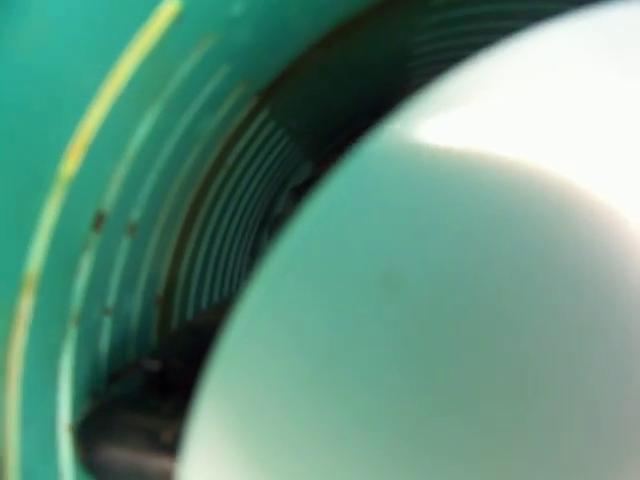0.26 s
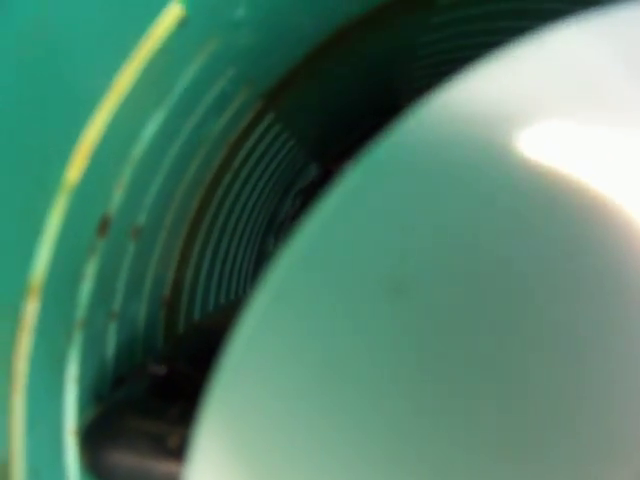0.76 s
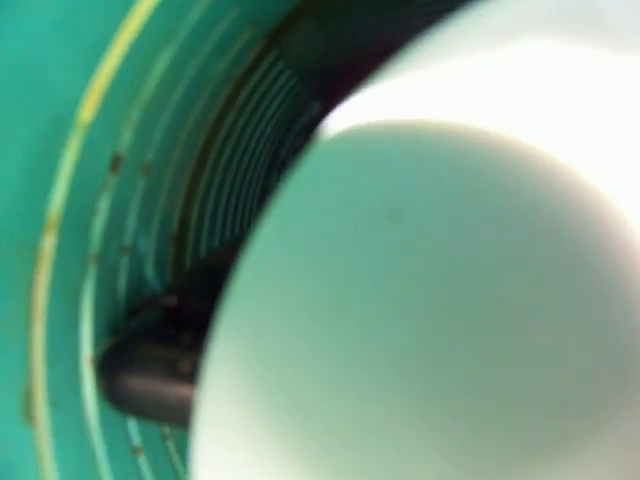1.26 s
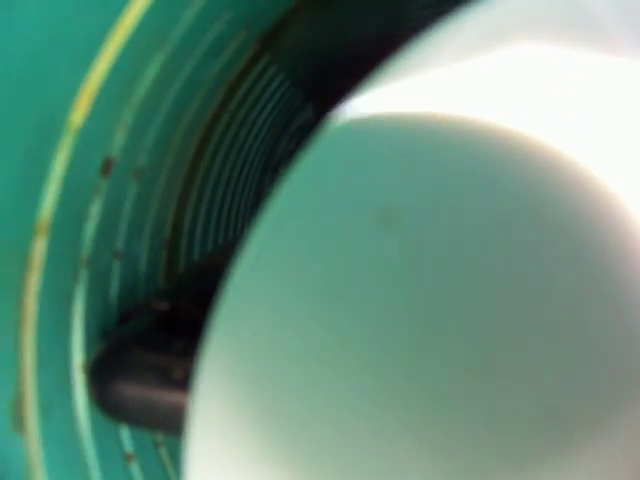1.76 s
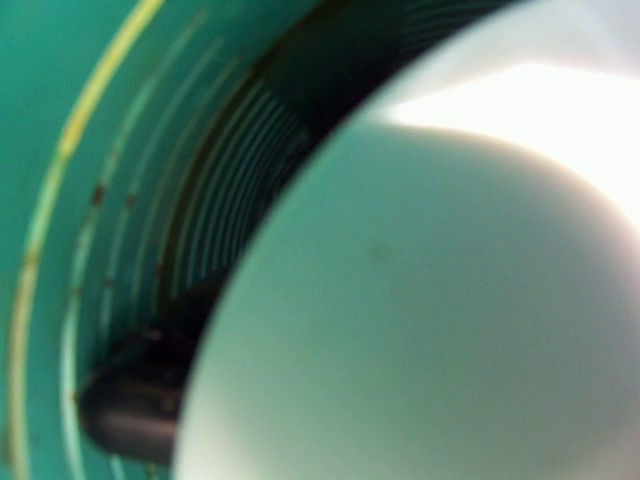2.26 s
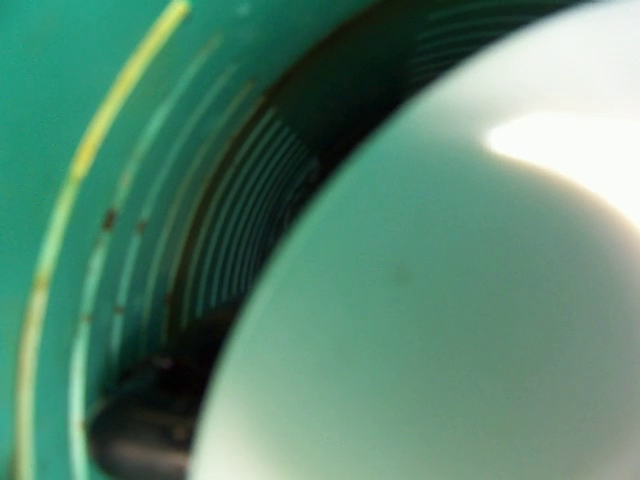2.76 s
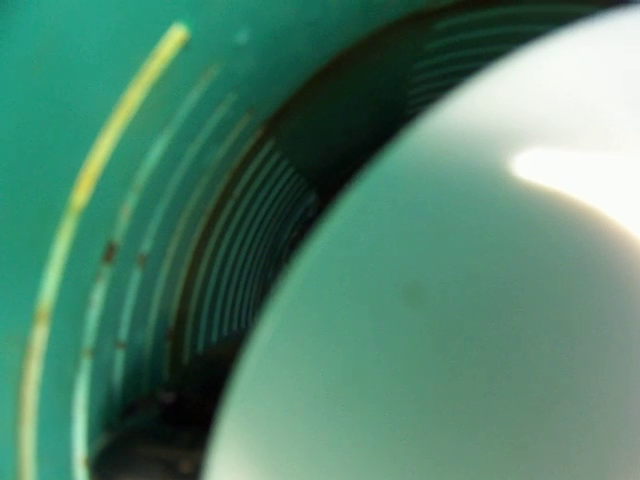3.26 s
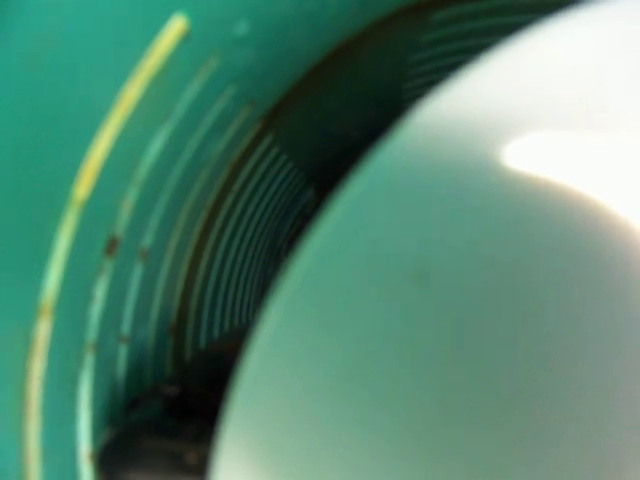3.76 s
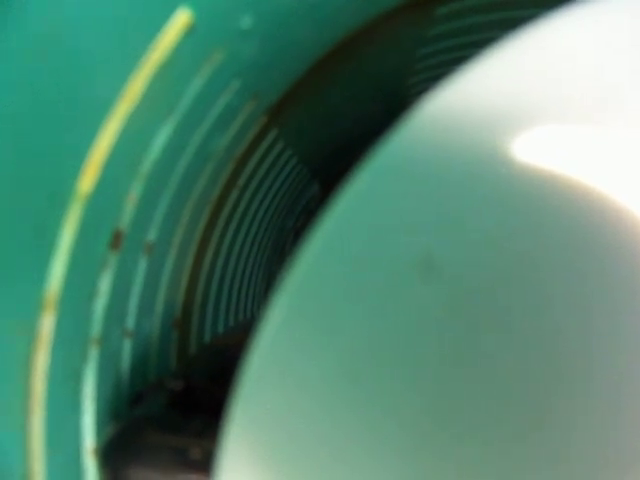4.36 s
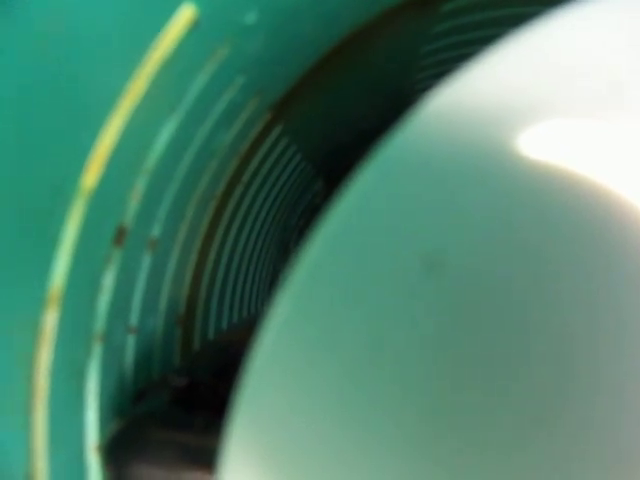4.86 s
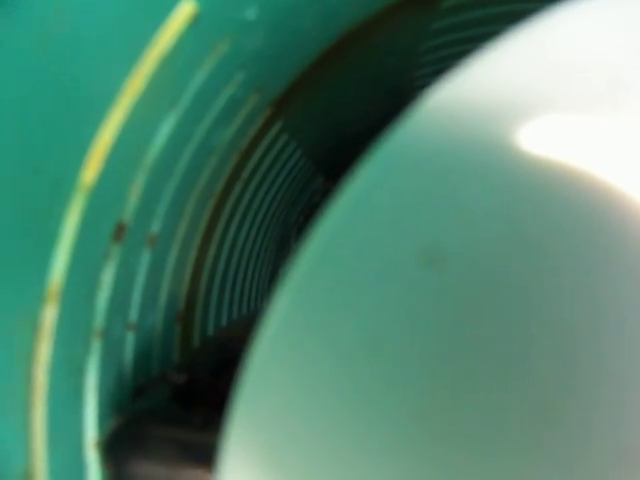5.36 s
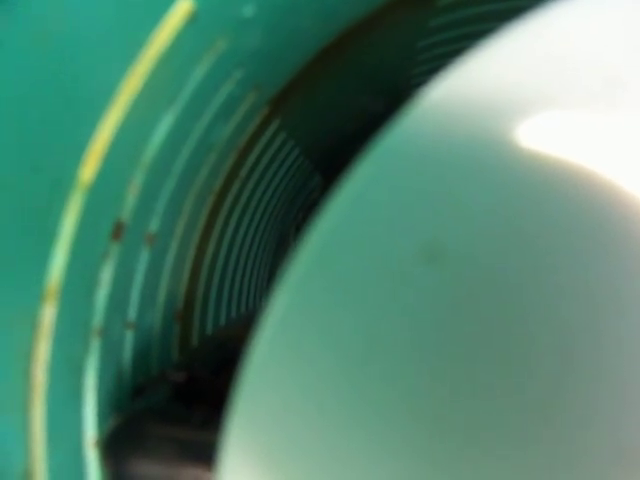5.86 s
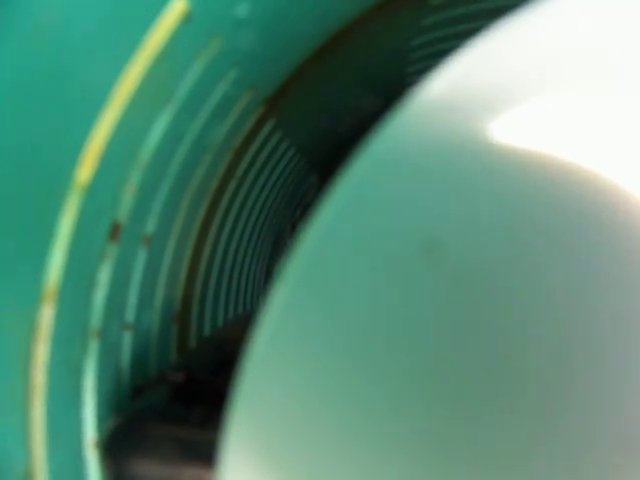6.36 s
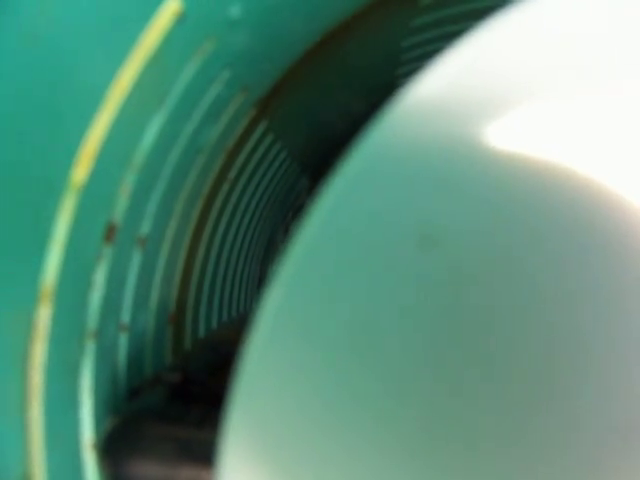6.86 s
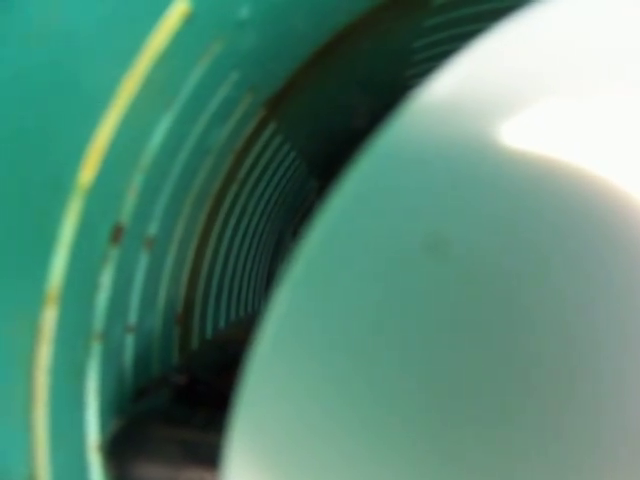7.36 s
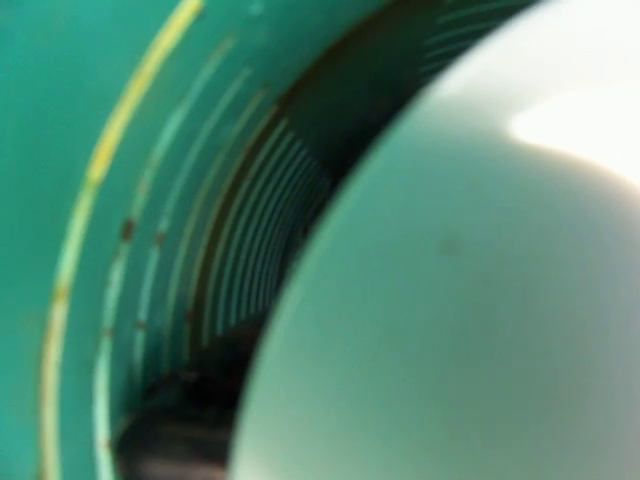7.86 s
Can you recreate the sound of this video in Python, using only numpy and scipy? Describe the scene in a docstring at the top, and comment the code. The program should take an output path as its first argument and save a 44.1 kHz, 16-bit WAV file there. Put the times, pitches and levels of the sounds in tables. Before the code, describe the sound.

A low, wavering pump hum with soft rumble, thin air noise and a very faint high whine continues throughout, heard close above a plastic standpipe. From 0 to 0.25 s a fuzzy, broken squeak slides upward in a puff of hiss, capped by a sharp plastic tick near 0.34 s. Then mostly hum, with faint wet ticks around 1.6 to 1.9 s. At about 2.3 s water starts gulping air: dense, ragged slaps, low glugs and hollow ringing bubbles, strongest around 2.8 to 3.3 s. Gulps thin briefly near 3.4 to 4 s, then return in uneven clusters from 4 to 5.1 s. From 5.2 to 6.1 s only a thin dribble remains, with scattered plinks. Around 6.2 s the flow strengthens, bubbling and splashing with gulps until about 7.1 s, then running on as a fuller, bright trickle to the end at 8 s. Reflections are short and tubular.

```python
"""Bell siphon starting to draw

Heard from close above a plastic standpipe, over a steady pump hum, with a brief rising squeak at the start.
Water gulps air in ragged bursts, eases to a thin dribble, then runs on more strongly with further gulps.
Gulps are clusters of noise splats and ringing, decaying sines for air bubbles, coloured by pipe resonances;
the trickle is swarms of small bubbles and droplets, and the pump is wavering tones in filtered noise."""
import sys
import numpy as np
from scipy import signal
from scipy.fft import rfft, irfft
from scipy.io import wavfile

SR = 44100
rng = np.random.default_rng(int(sys.argv[2]) if len(sys.argv) > 2 else 0)


def persist_wave(psi):
    """Save psi, clipped to +-1, as 16-bit WAV."""
    counts = np.round(np.clip(psi, -1, 1) * 32767).astype(np.int16)
    wavfile.write(sys.argv[1], SR, np.atleast_2d(counts).T)


N = 358091
TIME = np.arange(N) / SR

# The running water. Each row: time in seconds, level in dB, deep gurgle relative to it in dB.
FLOW = [(2.2, -58, -7), (2.5, -53.5, 12.5), (2.7, -43, 9.5), (2.9, -39, -4.5), (3.3, -47, 2),
        (3.65, -48, 2.5), (3.98, -51, 1), (4.45, -46.5, -2.5), (4.82, -48.5, -2), (5.0, -38, 4.5),
        (5.15, -46.5, 2.5), (5.55, -48, -4.5), (5.87, -52, -14.5), (6.3, -36.5, -6.5), (6.72, -35.5, 6),
        (7.28, -37.5, -11), (7.73, -38.5, -5), (8.1, -32.5, 1)]
# Colours of the three parts of a splash. Each row: frequency in Hz, relative level in dB per Hz.
THUD = [(60, -12), (150, -11), (300, -0.5), (520, 0.5), (720, -6.5), (1100, -13.5), (2500, -39.5)]
SLAP = [(300, -27), (650, -7), (900, 1), (1150, -8), (1700, -0.5), (2600, -1.5), (3400, -12.5),
        (4200, -22.5), (6000, -66)]
SPRAY = [(2000, -28), (3500, -3), (4200, -12.5), (5100, -2), (6100, -5.5), (7300, -1.5), (8200, -8),
         (9000, -4.5)]


def gain_of(db):
    """Decibels to amplitude."""
    return 10 ** (np.asarray(db) / 20)


def evened(x):
    """Scales to an rms of one."""
    return x / np.sqrt(np.mean(x ** 2) + 1e-20)


def curve(rows):
    """Joins the rows by straight lines, one signal per column after the time."""
    s, *columns = np.transpose(rows)
    return [np.interp(TIME, s, c) for c in columns]


def add(mix, s, sound):
    """Mixes a sound in at time s, in place."""
    part = mix[max(0, round(s * SR)):][:len(sound)]
    part += sound[:len(part)]


def wander(hz):
    """Slow chance of unit rms: noise kept to about hz changes a second."""
    hz_axis = np.fft.rfftfreq(N, 1 / SR)
    spectrum = rfft(rng.standard_normal(N)) * np.exp(-(hz_axis / hz) ** 2)
    return evened(irfft(spectrum, N))


def in_pipe(x, spectrum, share, size=4096):
    """Causal filter of unit energy: a broad spectrum lifted at the pipe resonances, by the given share."""
    # Each row: resonance in Hz, width in Hz, full lift in dB.
    resonances = [(900, 240, 13), (1337.5, 82, 14.5), (1705, 82, 9.5), (2300, 520, 4.5), (3155, 240, 4),
                  (5205, 300, 4.5), (8000, 260, 11)]
    hz = abs(np.fft.fftfreq(size, 1 / SR))
    f, db = np.transpose(spectrum)
    db = np.interp(np.log(hz + 1), np.log(f), db)
    lifts = sum(lift / (1 + (2 * (hz - centre) / width) ** 2) for centre, width, lift in resonances)
    log_gain = np.log(gain_of(db + share * lifts))
    # minimum phase: the energy comes as early as this colour allows
    response = np.exp(np.conj(signal.hilbert(log_gain)))
    taps = np.fft.ifft(response).real[:size // 2]
    return signal.oaconvolve(x, taps / np.linalg.norm(taps))[:N]


def bubble(hz, ring, rise, onset):
    """An air pocket swells into ringing and dies; positive rise lifts its pitch, as on nearing the surface."""
    # age counts ring times; a ring under 0.5 ms is stretched to that, its pitch lowered in proportion
    age = np.arange(0, 8, 1 / (max(ring, 1 / 2000) * SR))
    swing = (1 - np.exp(-age / onset)) ** 2 * np.exp(-age)
    cycles = hz * ring * (age + rise * age ** 2)
    return swing / swing.max() * np.sin(2 * np.pi * cycles)


def spatter(decay, swell):
    """A few milliseconds of bursting foam: enveloped spiky noise of unit energy, different every time."""
    t = np.arange(1, SR // 30) / SR
    grain = rng.standard_normal(len(t))
    spiky = grain * abs(grain)
    burst = spiky * (1 - np.exp(-t / swell)) * np.exp(-t / decay)
    return burst / np.linalg.norm(burst)


def gulp_splats(count=12):
    """Longer gulps open and close with a splat, uneven ones between: rows (s, thud dB, slap dB, spray dB)."""
    # Each row: start in seconds, length in seconds (under half a gap: one splat), thud, slap and spray in dB.
    gulps = [(.286, 0.0023, -50, -56, -47), (1.578, 0, -53, -45, -54), (1.72, 0.0064, -44, -37.5, -71),
             (1.942, 0, -68, -60, -47), (2.314, 0.00031, -32.5, -38.5, -50.5),
             (2.405, 0.0064, -39, -32, -39.5), (2.456, 0, -29, -31, -38), (2.487, 0.068, -32.5, -32, -42.5),
             (2.629, 0.007, -26.5, -30, -46.5), (2.675, 0.083, -28, -29.5, -42.5),
             (2.821, 0.0087, -22.5, -25.5, -42), (2.848, 0.011, -23, -19.5, -34.5),
             (2.92, 0.00049, -20, -32.5, -55), (2.952, 0.0075, -25, -29.5, -35.5),
             (3.055, 0.013, -26, -25, -36.5), (3.119, 0.031, -16.5, -23, -36),
             (3.151, 0.019, -39, -24, -33), (3.209, 0, -38, -28.5, -28.5), (3.289, 0.016, -25, -24, -33.5),
             (3.328, 0, -27, -27, -28), (3.367, 0.01, -40, -33, -59), (3.502, 0, -31, -37, -64),
             (3.528, 0.0048, -37, -30, -31), (3.559, 0.0065, -23.5, -26, -31),
             (3.585, 0.023, -31.5, -33.5, -53), (3.674, 0.0029, -25.5, -40, -47),
             (3.716, 0, -26, -29.5, -45), (3.742, 0, -37, -26, -59), (3.821, 0, -37, -40, -45.5),
             (3.877, 0.008, -24.5, -31, -31.5), (4.024, 0.047, -21.5, -22, -36),
             (4.116, .029, -25, -34, -34.5), (4.178, 0.0037, -26.5, -30.5, -44),
             (4.281, 0.0068, -22, -28.5, -37), (4.343, 0, -41, -42, -55), (4.38, 0.0075, -22.5, -23.5, -31),
             (4.413, 0.012, -30.5, -32, -54), (4.453, 0.0048, -20, -26, -36.5),
             (4.485, .015, -28, -24.5, -49.5), (4.517, 0, -54, -36, -29.5), (4.538, 0, -31, -27, -42),
             (4.574, 0.0033, -19.5, -26.5, -38), (4.643, 0.0015, -47, -31.5, -34),
             (4.666, 0.049, -25, -23.5, -34), (4.745, 0.0014, -22.5, -32, -28),
             (4.763, .014, -19.5, -31, -40), (4.919, 0.076, -28, -26, -39), (5.019, 0, -25, -27, -56),
             (5.07, .011, -29, -35.5, -55), (5.251, 0.004, -38, -44, -62), (5.458, 0.0059, -48, -34, -65),
             (5.542, 0.0089, -42.5, -38.5, -45), (6.103, 0.0019, -50, -58, -35.5),
             (6.181, 0, -46, -37, -34.5), (6.227, 0.0032, -41, -30, -36), (6.263, 0.0026, -50, -28.5, -39),
             (6.324, .019, -33, -27.5, -31.5), (6.36, 0, -42, -29.5, -37), (6.394, 0, -28, -25.5, -48),
             (6.53, 0, -29, -40, -37), (6.552, 0.005, -27, -34, -37), (6.58, 0.033, -25.5, -27, -37),
             (6.638, .016, -39, -25, -56), (6.686, 0.086, -25.5, -26, -37),
             (6.822, 0.0087, -24, -37, -36.5), (6.864, 0.0066, -25, -25.5, -34.5),
             (6.911, 0.033, -32, -29.5, -40.5), (6.995, 0.019, -24, -34, -44),
             (7.069, 0.0041, -30, -30, -49), (7.313, 0, -50, -34, -41), (7.36, 0.004, -55, -32, -49),
             (7.578, 0.0079, -34.5, -30.5, -37.5), (7.663, 0.0017, -33, -34, -43),
             (7.804, 0.0039, -34, -37, -43), (7.892, .023, -35, -39, -39.5), (7.958, .13, -40, -35.5, -60)]
    gap_s, jitter, spread_db = .013, .3, 3.5  # jitter is a share of the actual gap
    rows = []
    for (start, length, *levels), draws in zip(gulps, rng.uniform(-1, 1, (len(gulps), count, 4))):
        gaps = min(round(length / gap_s), count - 1)
        for k, (late, *louder) in enumerate(draws[:gaps + 1]):
            inside = 0 < k < gaps
            s = start + length * (k + inside * jitter * late) / max(gaps, 1)
            splat_levels = np.array(levels) + inside * spread_db * np.array(louder)
            rows.append([s, *splat_levels])
    return np.array(rows)


def stray_splats(count=170):
    """The running water splats at odd moments, as strongly as it flows; same rows as for the gulps."""
    part_db, spread_db = (-3, -1, -8), 6  # thud, slap and spray relative to the flow
    s, flow_db, deep_db = np.transpose(FLOW)
    when = s[0] + (s[-1] - s[0]) * (np.arange(count) + rng.random(count)) / count
    chance_db = spread_db * rng.uniform(-1.2, 1, (count, 3))
    levels = np.interp(when, s, flow_db)[:, None] + part_db + chance_db
    levels[:, 0] += np.interp(when, s, deep_db)
    return np.column_stack([when, levels])


def splat_part(times, levels, spectrum, part_db, decay, swell, share, count=61):
    """One noise burst in the pipe for each splat; its level plus part_db is the rms over 5 ms."""
    out = np.zeros(N)
    pipe = in_pipe(np.ones(1), spectrum, share)
    bursts = [signal.fftconvolve(spatter(decay, swell), pipe) for _ in range(count)]
    for k, (s, db) in enumerate(zip(times, levels)):
        burst = bursts[k % count]
        unit_rms = np.sqrt(SR / 200) * burst / np.linalg.norm(burst)
        add(out, s, gain_of(db + part_db) * unit_rms)
    return out


def spray_bubbles(hits, ring_db=-1, ring=0.0013, lag=0.0045, count=2):
    """Each splat traps a couple of tiny bubbles that ping within lag seconds of it."""
    out = np.zeros(N)
    for (s, _, _, spray_db), draws in zip(hits, rng.random((len(hits), count, 2))):
        for when, size in draws:
            ping = bubble(4900 + 3300 * size, ring, rise=0.0013, onset=0.68)
            add(out, s + lag * when, gain_of(spray_db + ring_db) * ping)
    return out


def splats(hits):
    """Water closing over the air gap: a low thud, a slap in the pipe and fine spray."""
    s, thud_db, slap_db, spray_db = hits.T
    thud = splat_part(s, thud_db, THUD, part_db=-0.7, decay=0.0016, swell=0.0002, share=0.27)
    slap = splat_part(s, slap_db, SLAP, part_db=-1.5, decay=0.0016, swell=0.00028, share=0.82)
    spray = splat_part(s, spray_db, SPRAY, part_db=2, decay=0.0012, swell=0.00032, share=1.0)
    return thud + slap + spray + spray_bubbles(hits)


def loud_bubbles(bubble_db=-0.16):
    """The loudest single bubbles and short watery clicks, each a brief ringing with a climbing pitch."""
    # Each row: time in seconds, level in dB before bubble_db, starting pitch in Hz, ring time in seconds.
    loudest = [(2.6924, -25, 454, 0.0084), (2.7504, -17.5, 1390, .0047), (2.819, -15, 820.7, .0061),
               (2.8577, -19, 2740, .0017), (2.8623, -20, 2260, 0.00095), (2.8657, -15.5, 920, 0.0042),
               (2.9742, -17, 1699, .0043), (2.9761, -6, 912, 0.0018), (3.0579, -8.5, 864, 0.0038),
               (3.07, -9.5, 827, 0.0025), (3.116, -20, 487, .0073), (3.118, -13, 860, 0.0045),
               (3.139, -22, 375, .005), (3.1481, -10, 864, 0.0025), (3.2064, -17, 880, .0027),
               (3.2863, -21, 890, 0.01), (3.2884, -14, 2390, 0.0015), (3.32, -18, 887.7, 0.0062),
               (4.0364, -18, 796.4, 0.0057), (4.1281, -15.5, 798, 0.0071), (4.1429, -19, 595.2, 0.0054),
               (4.1445, -16, 2300, 0.0024), (4.2473, -20.5, 820.4, 0.0048), (4.3756, -15.5, 865, 0.0054),
               (4.3884, -12.5, 2871, 0.00072), (4.3922, -23, 2436, .0016), (4.4113, -17, 877.8, 0.0031),
               (4.4229, -25, 408, 0.0066), (4.452, -12, 426.8, 0.0049), (4.4696, -25, 2380, 0.0035),
               (4.4977, -20.5, 2490, 0.0051), (4.4979, -14, 1300, 0.0065), (4.5359, -18, 840, .0034),
               (4.5457, -21, 860.6, 0.0044), (4.5734, -13, 818, 0.0023), (4.6767, -12, 2281, 0.00058),
               (4.6816, -24, 2264, 0.004), (4.697, -16.5, 1211, 0.0033), (4.709, -25, 2438, 0.0087),
               (4.734, -13.5, 1294, 0.0032), (4.7609, -16.5, 575.3, 0.0025), (4.814, -23.5, 893, 0.005),
               (4.9556, -25, 933.6, 0.0055), (4.9861, -13, 846, .0032), (5.2093, -26.5, 872, 0.0063),
               (6.2754, -29, 1282, 0.0066), (6.4442, -17.5, 1520, 0.0026), (6.5549, -17.5, 844, 0.0061),
               (6.586, -17.5, 2924, .0015), (6.5948, -17, 2212, 0.0039), (6.6528, -15, 879, 0.0031),
               (6.6739, -16, 873, 0.0053), (6.7661, -17.5, 851.3, .01), (6.775, -14.5, 2850, .0005),
               (6.792, -10.5, 1426, 0.0021), (6.8658, -8, 1772, 0.00066), (6.8816, -12.5, 2326, .0011),
               (6.9799, -26, 1608, .0097), (7.0282, -20, 1726, .0027), (7.207, -27, 1486, .0043),
               (7.8671, -23.5, 2580, 0.003), (7.9048, -19, 1496, .003), (7.9106, -21.5, 964, 0.0038),
               (8.0297, -23, 877, 0.0075)]
    out = np.zeros(N)
    for (s, db, hz, ring), climb in zip(loudest, rng.uniform(0.24, 2.3, len(loudest))):
        add(out, s, gain_of(db + bubble_db) * bubble(hz, ring, rise=0.02 * climb, onset=0.19))
    return out


def trapped_bubbles(hits, sizes, lag_s=0.006052, detune=.06, rise=.04, onset=0.36):
    """Each splat traps one bubble, near one of the given sizes, that rings within lag_s of it."""
    out = np.zeros(N)
    for (s, _, slap_db, _), (kind, late, size, climb) in zip(hits, rng.random((len(hits), 4))):
        hz, db, ring = sizes[int(kind * len(sizes))]
        ringing = bubble(hz * (1 + detune * (2 * size - 1)), ring, rise * climb, onset)
        add(out, s + lag_s * late, gain_of(slap_db + db) * ringing)
    return out


def drops(per_s, spread_db):
    """Random impacts of either sign, most of them small, as single samples."""
    at = rng.random(N) < per_s / SR
    size, sign = rng.exponential(1, N), rng.choice([-1, 1], N)
    out = np.zeros(N)
    out[at] = sign[at] * gain_of(spread_db * np.minimum(size[at], 3))
    return out


def small_bubbles(low_hz, high_hz, per_s, spread_db, cycles, rise, count=40):
    """A swarm of little bubbles of many sizes; most glide up, a few down."""
    hits, size = drops(per_s, spread_db), rng.integers(0, count, N)
    pitches = np.geomspace(low_hz, high_hz, count) * rng.uniform(0.98, 1.03, count)
    out = np.zeros(N)
    for k, hz in enumerate(pitches):
        ring = cycles / hz * rng.uniform(0.27, 1.6)
        sound = bubble(hz, ring, rise * rng.uniform(-0.88, 1.87), onset=0.24)
        out += signal.oaconvolve(hits * (size == k), sound)[:N]
    return evened(out)


def droplets(spectrum, per_s, spread_db, decay, share, count=12):
    """Drops landing at many spots, each spot with its own spatter."""
    hits, spot = drops(per_s, spread_db), rng.integers(0, count, N)
    out = sum(signal.oaconvolve(hits * (spot == k), spatter(decay, decay / 2))[:N] for k in range(count))
    return evened(in_pipe(out, spectrum, share))


def churn(hits, churn_db=-10, settle=0.0077):
    """Each splat stirs up a swarm that settles exponentially (settle in seconds); returns its power."""
    kicks = np.zeros(N)
    for s, _, slap_db, _ in hits:
        add(kicks, s, np.atleast_1d(gain_of(slap_db + churn_db) ** 2))
    return signal.lfilter([1], [1, -np.exp(-1 / (settle * SR))], kicks)


def trickle(hits, tinkle_db=-7, plop_db=-9, patter_db=-9, gurgle_db=-4, fizz_db=-15, ping_db=-15, surge_db=3.0):
    """Small bubbles and droplets, all following the uneven flow and the churn after each splat."""
    flow_db, deep_db = curve(FLOW)
    flow = gain_of(flow_db + surge_db * wander(34))
    activity = np.sqrt(flow ** 2 + churn(hits))
    tinkle = small_bubbles(875, 3660, per_s=1000, spread_db=6.0, cycles=3.6, rise=0.024)
    plops = small_bubbles(1056, 3500, per_s=130, spread_db=5.0, cycles=6.8, rise=0.03)
    gurgle = small_bubbles(172.6, 780, per_s=280, spread_db=4.5, cycles=1.403, rise=0.043)
    pings = small_bubbles(4640, 9060, per_s=330, spread_db=13.5, cycles=6.0, rise=0.0021)
    patter = droplets(SLAP, per_s=600, spread_db=12.5, decay=0.0014, share=0.73)
    fizz = droplets(SPRAY, per_s=390, spread_db=7, decay=0.0023, share=0.34)
    layers = [gain_of(tinkle_db) * evened(in_pipe(tinkle, SLAP, share=0.58)),
              gain_of(plop_db) * evened(in_pipe(plops, SLAP, share=0.61)),
              gain_of(gurgle_db + deep_db) * evened(in_pipe(gurgle, THUD, share=0.34)),
              gain_of(ping_db) * evened(in_pipe(pings, SPRAY, share=0.88)),
              gain_of(patter_db) * patter,
              gain_of(fizz_db) * fizz]
    return activity * sum(layers)


def reflections(x, t60):
    """Sparse random echoes of unit energy, falling 60 dB in t60 seconds."""
    t = np.arange(SR // 4) / SR
    sparse = rng.standard_normal(len(t)) * (rng.random(len(t)) < 1 / 10)
    taps = sparse * (t > .002) * gain_of(-60 * t / t60)
    return signal.oaconvolve(x, taps / np.linalg.norm(taps))[:N]


def housing(x, near_db=-13, far_db=-19, notch_hz=4200, notch_width_hz=450):
    """The plastic guard around the standpipe throws the sound about and weakens one narrow band."""
    x = x + gain_of(near_db) * reflections(x, t60=0.033) + gain_of(far_db) * reflections(x, t60=0.08)
    notched = signal.lfilter(*signal.iirnotch(notch_hz, notch_hz / notch_width_hz, SR), x)
    return notched + gain_of(-20.0) * (x - notched)  # the cancellation is not complete


def squeak(width_hz=300, broken_db=3, under=0.64, under_db=-3):
    """Two fuzzy, broken rising whistles of narrow noise in a puff of hiss, then a sharp plastic tick."""
    # Each row: time in seconds, pitch of the upper whistle in Hz, level in dB.
    glide = [(0, 2300, -64), (.06, 2570, -53), (.11, 3050, -61), (.145, 3490, -51), (.18, 3740, -57),
             (.22, 4740, -65), (.25, 4760, -69)]
    # Each row: time in seconds, hiss level in dB.
    puff = [(0, -54.5), (.08, -43.5), (.2, -47), (.26, -51.5), (.33, -51), (.42, -63)]
    # Each row: frequency in Hz, relative level of the hiss in dB per Hz.
    puff_colour = [(1200, -6), (2200, -2), (2800, 5), (3500, -3), (4200, -18), (5500, -8.5), (7500, 3),
                   (8500, -4.5)]
    # Modes of the tick. Each row: frequency in Hz, peak level in dB, ring time in seconds.
    tick_modes = [(2020, -28, 0.0012), (2500, -36, 0.0017), (3380, -38, 0.0013), (5600, -37, .0006),
                  (7500, -21, 0.001), (8000, -18.5, 0.00073)]
    tick_s = .3415
    hz, db = curve(glide)
    turn = 2 * np.pi * np.cumsum(hz) / SR
    upper = gain_of(broken_db * wander(50)) * evened(wander(width_hz) * np.cos(turn))
    lower = evened(wander(2 * width_hz) * np.cos(under * turn))
    lower = gain_of(under_db + broken_db * wander(50)) * lower
    whistles = gain_of(db) * (upper + lower) * (TIME < glide[-1][0])
    hiss = gain_of(curve(puff)[0]) * in_pipe(rng.standard_normal(N), puff_colour, share=0.25)
    out = whistles + hiss * (TIME < puff[-1][0])
    for mode_hz, mode_db, ring in tick_modes:
        add(out, tick_s, gain_of(mode_db) * bubble(mode_hz, ring, rise=0, onset=0.33))
    return out


def pump(air_db=-41.0, whine_db=-69.0, flutter_db=0.93):
    """Wavering pump tones and a thin beating whine in low rumble and air of filtered noise."""
    # Each row: time in seconds, gain in dB on the whole background.
    loudness = [(0, -2.5), (.7, -0.5), (1, 2), (2.75, 0.5), (2.95, -4), (3.3, -8), (4.8, -7.5), (5.9, -9.5),
                (6.2, 2.5), (7.2, -0.5), (8.1, 2)]
    # Each row: frequency in Hz, rms in dB before the loudness curve, unsteadiness from 0 to 1.
    tones = [(33.9, -42, 0.52), (59, -44, 0.29), (70.4, -49, 0.9), (110.4, -52, 0.71), (178.7, -53, 0.46)]
    # Rumble and air. Each row: frequency in Hz, relative level in dB per Hz.
    air_colour = [(15, -4.5), (40, -7), (70, -0.5), (100, -5.5), (140, -12.5), (350, -16), (520, -30),
                  (1300, -31), (2300, -32), (3200, -40), (4200, -53.5), (5200, -47), (6500, -44),
                  (7700, -38), (8500, -45.5)]
    # The two whine tones, in Hz.
    whine_tones = [7989, 8011]
    hum = np.zeros(N)
    for hz, db, loose in tones:
        chance = (wander(3.7) + 1j * wander(3.4)) / np.sqrt(2)  # wavers in level and phase
        tone = (1 - loose + loose * chance) * np.exp(2j * np.pi * hz * TIME)
        hum += gain_of(db) * evened(tone.real)
    whine = sum(evened(np.sin(2 * np.pi * hz * TIME + .4 * wander(6))) for hz in whine_tones)
    fluttering = rng.standard_normal(N) * gain_of(flutter_db * wander(39))
    air = gain_of(air_db) * evened(in_pipe(fluttering, air_colour, share=0.85))
    return gain_of(curve(loudness)[0]) * (hum + gain_of(whine_db) * whine + air)


def scene():
    """The water in its housing, over the pump and the squeak."""
    # Bubble sizes, equally likely. Each row: pitch in Hz, level relative to the slap in dB, ring time in seconds.
    gulp_sizes = [(378, -2, 0.0042), (520, -4.5, 0.0041), (934, 2, 0.003), (974, 1, 0.0026),
                  (1300, -2, 0.0044), (2300, 2, .002)]
    # The same columns for the plinks of the running water.
    plink_sizes = [(937, -2, 0.0032), (1300, 7.5, 0.0048), (1520, 5, .004), (1655, 6, 0.0039),
                   (2076, 2, .003), (2860, 3.5, .002)]
    strays, gulps = stray_splats(), gulp_splats()
    hits = np.vstack([strays, gulps])
    plinks = trapped_bubbles(strays, plink_sizes, lag_s=0.0088, detune=0.069, rise=.018)
    trapped = trapped_bubbles(gulps, gulp_sizes, lag_s=0.00505, detune=0.074, rise=.018)
    bubbles = loud_bubbles() + plinks + trapped
    water = housing(trickle(hits) + bubbles + splats(hits))
    return (pump() + squeak() + water)[None]


def record(dry):
    """The band limit of a small recorder: a low-pass filter."""
    edge_hz = 8400
    taps = signal.firwin(141, edge_hz, window=("kaiser", 8), fs=SR)
    return signal.oaconvolve(dry, taps[None], "same")


dry = scene()
out = record(dry)
persist_wave(out)
```